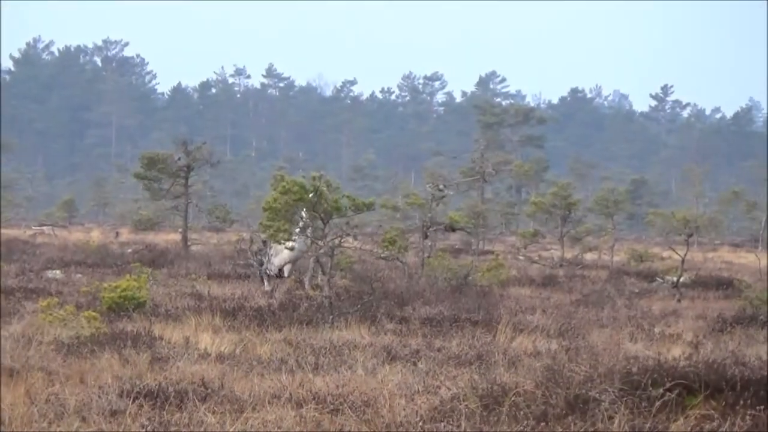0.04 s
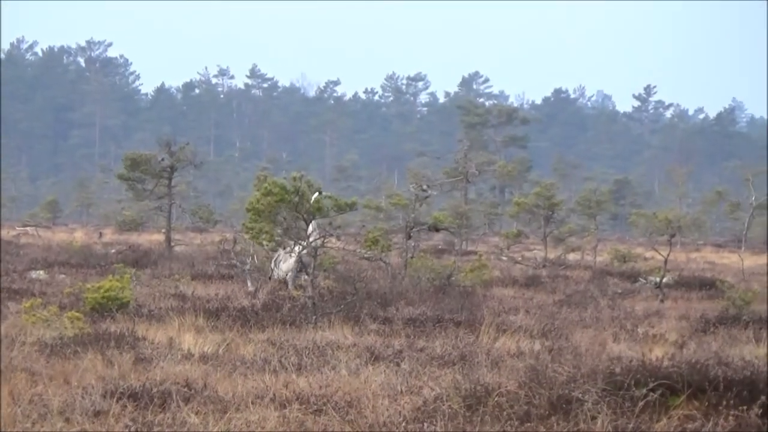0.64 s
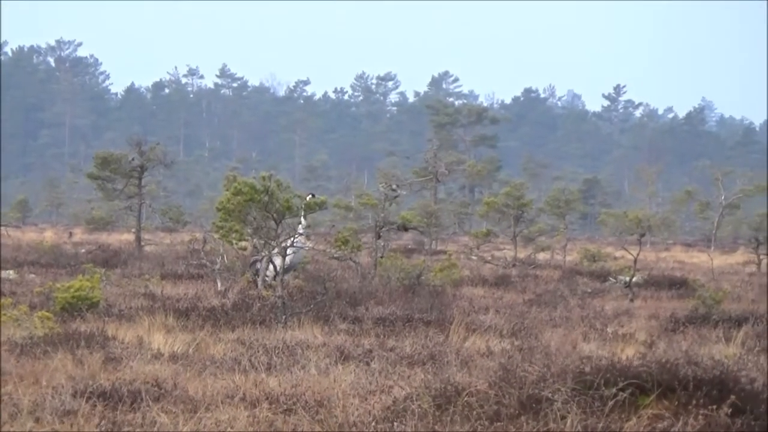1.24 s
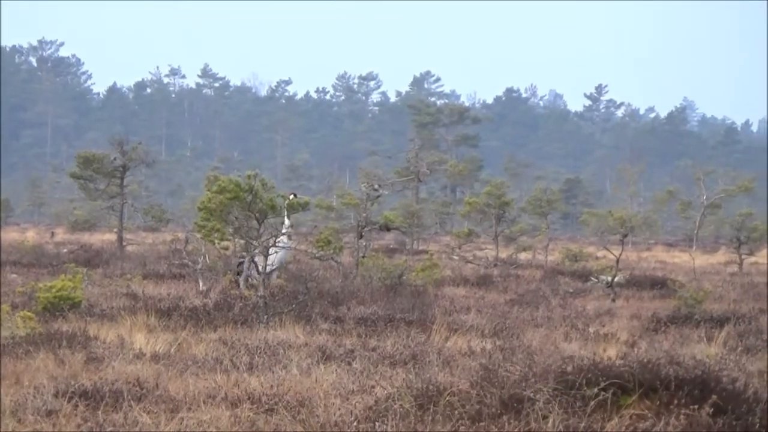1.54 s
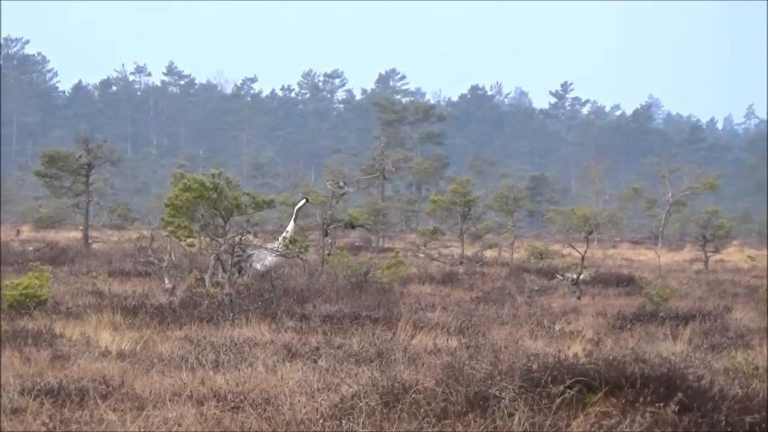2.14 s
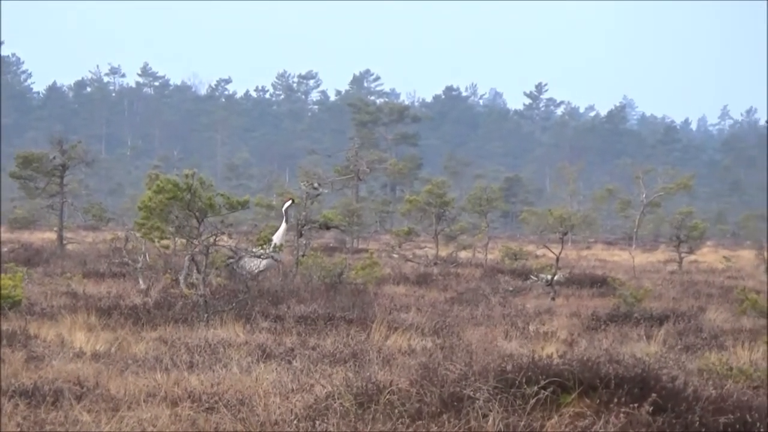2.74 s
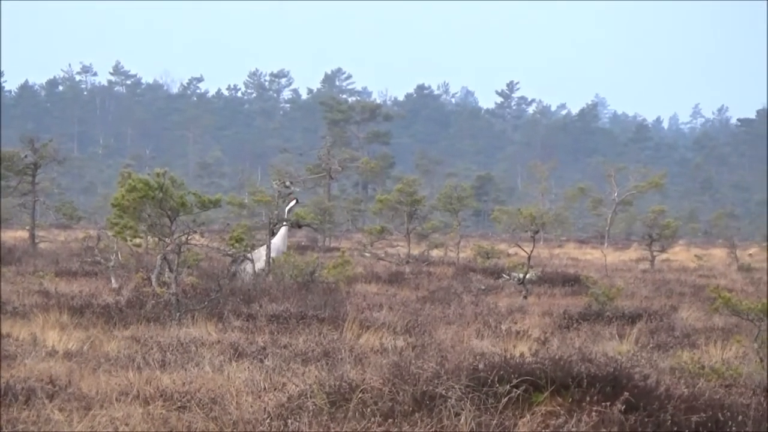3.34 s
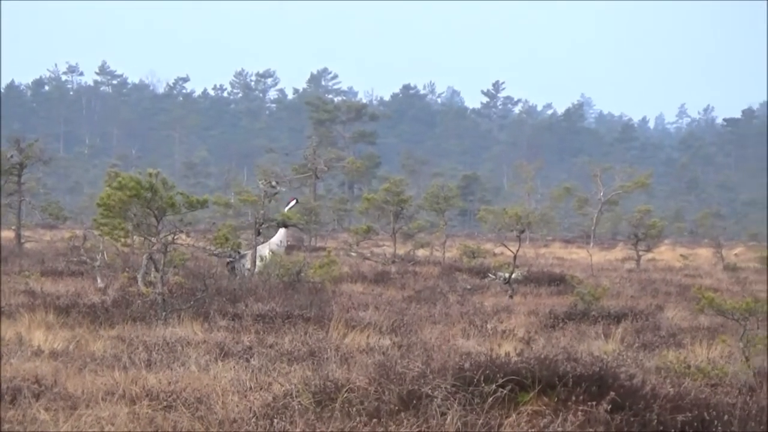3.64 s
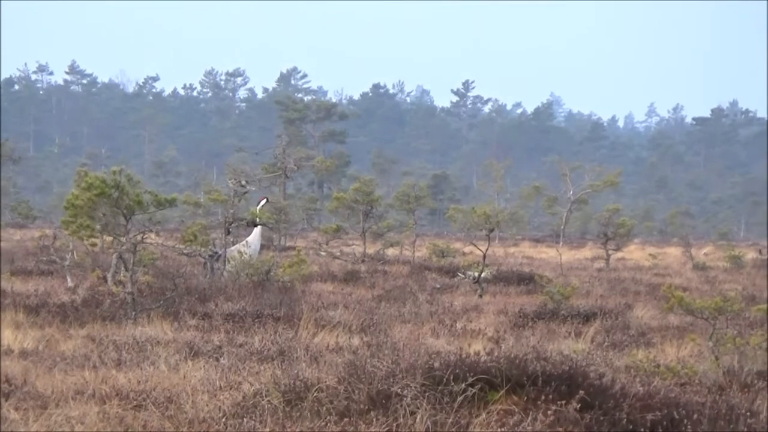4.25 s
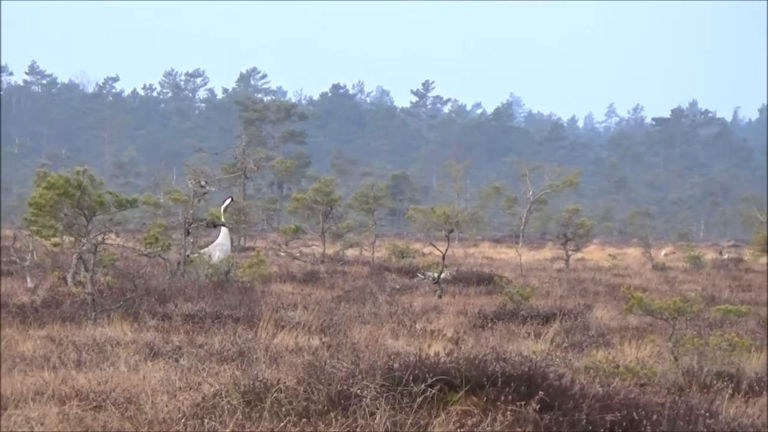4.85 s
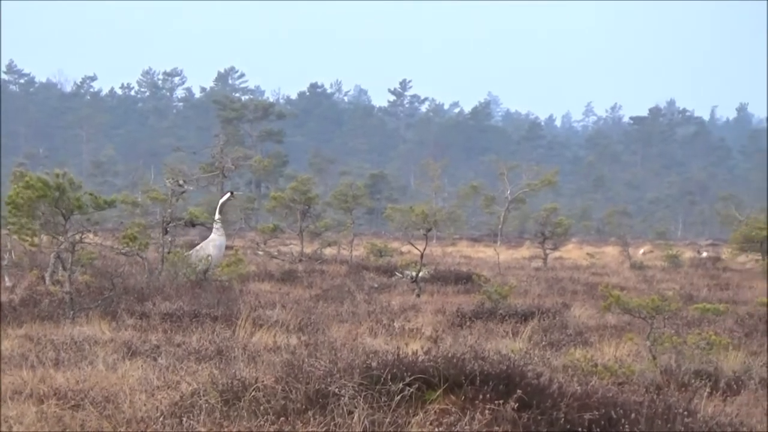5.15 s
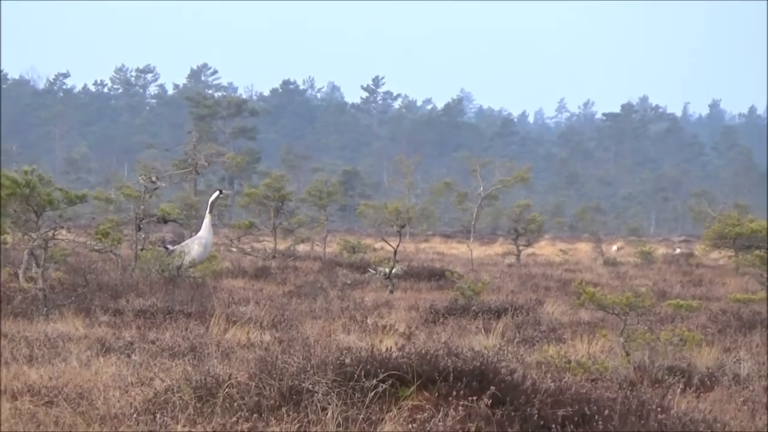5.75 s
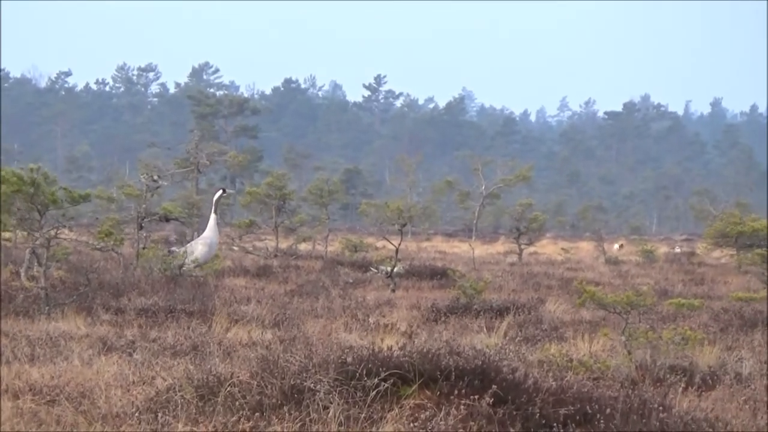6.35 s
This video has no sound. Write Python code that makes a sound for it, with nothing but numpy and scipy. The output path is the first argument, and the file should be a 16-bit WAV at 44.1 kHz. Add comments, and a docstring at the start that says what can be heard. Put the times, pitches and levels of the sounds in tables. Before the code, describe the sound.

A crane gives a short, loud, high trumpeting call that breaks into a croak. For about five seconds there is only wind buffeting the microphone and hissing in dry heather, with close taps and rubs from a hand holding the camera. Then two quick croaks lead into a longer, clear call that sags at its end. A faint, lower call follows, outdoors on an open bog.

```python
"""Crane on a windy bog

A crane's syrinx membrane sounds two loud, nearly pure calls that sag and break up as the air runs out,
then a faint lower one. Shrubs scatter a little of each call back. Close by, a hand-held camera is
rubbed and tapped. Wind buffets the microphone and hisses in the heather."""
import sys
import numpy as np
from scipy import signal
from scipy.fft import rfft, irfft
from scipy.io import wavfile
from scipy.ndimage import uniform_filter1d, map_coordinates

SR = 44100
rng = np.random.default_rng(int(sys.argv[2]) if len(sys.argv) > 2 else 0)


def put_to_file(sound):
    """Save the sound as 16-bit audio at rate SR, in the file named by the first command-line argument."""
    columns = np.atleast_2d(sound).T  # one column per channel
    safe = np.clip(columns, -1, 1)
    whole_steps = np.round(safe * 32767)
    wavfile.write(sys.argv[1], SR, whole_steps.astype(np.int16))


N = 286650
T = np.arange(N) / SR

# Voice courses: (time [s], pitch [Hz], level [dB], overtone gain [dB], roughness [-])
FAINT_CALL = [(6.25, 907, -68, -3, 0.84), (6.29, 888, -66, -10, 0.65), (6.35, 942, -64, -3, 0.3),
              (6.39, 954, -58, -7, 0.1), (6.45, 971, -57, 1.5, 0.1), (6.5, 978, -58.5, 0.5, .04)]
SECOND_VOICE = [(0, 983, -52.5, -17, 0), (.052, 950, -59, -1, 0), (.068, 898, -52.5, -3, 0.2),
                (.1, 887, -52, -5, 0.05), (.15, 860, -56, 3, 0), (.17, 850, -64, 2, .2)]  # other side of the syrinx, under the first call
# Croaks around the clean tone:
# (start [s], length [s], pitch [Hz], level [dB], overtone gain [dB], roughness [-])
CROAKS = [(.172, 0.015, 1099, -36, 3, 0.87), (0.22, 0.049, 1016, -47, 2, 1.08),
          (5.193, .021, 1020, -39, -2, .7), (5.239, .017, 1173, -31.5, -2.5, .35),
          (5.747, 0.056, 1030, -51, -3, .9)]
# Partials of each voice: (harmonic [-], relative level [dB])
FIRST_PARTIALS = [(1, 0), (2, -6), (3, -8), (4, -16), (5, -14), (6, -9), (7, -11), (8, -21), (9, -15),
                  (10, -20), (11, -29)]
SECOND_PARTIALS = [(1, 0.5), (2, -10), (3, -19)]
LONG_PARTIALS = [(1, 0), (2, -29), (3, -10), (4, -23), (5, -26), (6, -27), (7, -40), (8, -31), (9, -36),
                 (10, -40)]
FAINT_PARTIALS = [(1, 0), (2, -4), (3, -3), (4, -14), (5, -10), (6, -11), (7, -17), (8, -15), (9, -21)]
CROAK_PARTIALS = [(1, 0.5), (2, -11.5), (3, -7.5), (4, -15), (5, -19.5), (6, -22), (7, -26), (9, -27)]

# Taps on the camera: (time [s], blow level [dB], treble level [dB], knock pitch [Hz])
TAPS = [(0.873, -25, -32, 1090), (1.021, -33.5, -3, 1440), (1.498, -33, -18, 627), (2.186, -29, -23, 623),
        (2.197, -29, -19, 650), (2.721, -34, -24, 636), (3.288, -23.5, -24, 1670), (3.531, -31, -25, 610),
        (3.804, -32.5, -2.5, 810), (3.836, -23, -27, 1180), (3.878, -25.5, -27, 1030),
        (3.891, -24, -31, 1190), (3.971, -26.5, -23, 912), (4.206, -27.5, -25, 1630),
        (4.235, -23, -14, 1160), (4.645, -32.5, -16, 625), (4.785, -31, -25, 770), (5.822, -36, -6, 918),
        (6.16, -34.5, -23, 600)]
# Housing resonances: (centre [Hz], width [Hz], gain [dB])
HOUSING_MODES = [(686, 450, -1), (1200, 540, 1), (1680, 420, 2.5), (2800, 490, -2), (3800, 990, -10)]
# Firm rubs of hand and sleeve: (start [s], length [s], body level [dB], scrape level [dB])
RUBS = [(0.643, .03, -58, -54.5), (0.693, 0.1, -56, -66), (1.825, 0.096, -69, -63),
        (2.028, 0.012, -60, -50.5), (2.31, 0.023, -49.5, -59), (2.412, 0.057, -47.5, -57),
        (2.489, .04, -49, -54), (2.531, 0.017, -49, -40.5), (2.551, 0.021, -39.5, -42),
        (2.616, 0.019, -45, -55), (2.63, .009, -43, -47), (2.659, .012, -47, -59), (2.716, 0.05, -51, -65),
        (3.028, 0.019, -46, -58.5), (3.278, 0.067, -53.5, -63), (3.555, 0.027, -44.5, -62),
        (3.681, 0.017, -45, -54.5), (3.715, 0.059, -57, -57.5), (3.836, .022, -42, -67),
        (3.943, .014, -46.5, -65), (3.983, 0.012, -37, -37), (3.994, 0.03, -40, -51),
        (4.035, 0.056, -40.5, -47.5), (4.094, .016, -49, -42), (4.238, 0.021, -45, -59),
        (4.403, 0.028, -41.5, -62), (4.883, 0.045, -41, -53.5), (4.956, 0.011, -51, -43),
        (5.032, 0.01, -53.5, -52), (5.351, 0.025, -39.5, -64), (5.437, 0.032, -46, -66),
        (6.17, 0.01, -45.5, -58.5)]

# Wind strength, before each layer's gain: (time [s], buffet level [dB], rustle level [dB])
GUSTS = [(0.3, -58, -73), (0.44, -58, -70), (0.82, -53.5, -65.5), (1.06, -59, -73), (1.25, -58.5, -73.5),
         (1.65, -56, -72), (2.13, -57.5, -74), (2.63, -52, -61), (3.3, -54.5, -67), (3.63, -54.5, -67),
         (4.06, -48, -58.5), (4.39, -53, -67), (4.82, -52, -60.5), (5.01, -52.5, -67), (5.57, -52.5, -59),
         (5.89, -55.5, -68.5), (6.05, -55.5, -69), (6.5, -59.5, -70)]
# Drone of distant air: (time [s], level [dB])
DRONE_LEVEL = [(0, -62), (1.3, -63.5), (2.6, -63.5), (4, -70.5), (6.5, -69.5)]
# Noise spectra: (frequency [Hz], relative density [dB])
BODY_SPECTRUM = [(50, -14), (130, 4), (220, 8.5), (400, 5.5), (750, -4.5), (1200, -1), (2000, -7.5),
                 (3000, -8.5), (4500, -20.5), (9000, -30)]
SCRAPE_SPECTRUM = [(1500, -5.5), (3500, -2.5), (6000, -1), (9000, -3), (12000, -3.5), (15500, -17)]
BUFFET_SPECTRUM = [(20, -32), (45, -9.5), (90, -8.5), (140, -2.5), (190, 1), (270, -2), (380, -5.5),
                   (560, -6), (750, -9), (1100, -20), (1500, -25)]
RUSTLE_SPECTRUM = [(400, -4), (800, 0.5), (1300, 2), (2000, -4.5), (3000, -7), (4500, -16), (8000, -23.5)]
HISS_SPECTRUM = [(2000, -11), (4000, -1), (6500, -1), (9000, 1), (12000, 1), (14000, -2), (16000, -4.5)]
DRONE_SPECTRUM = [(25, -24), (50, -17), (80, -7), (105, 3), (135, -4.5), (220, -18)]

CALL_HZ = 1193  # at full pressure
SCOOP_HZ, SCOOP_S = 85, .0169  # quick rise into pitch
TIGHTEN_HZ, TIGHTEN_S = 16, .09  # slower rise
SAG_HZ, SAG_S = 73.2, .032  # air runs out
BREAK_HZ, SLIDE_HZ_PER_S, SLIDE_S = 37.8, 1420, .049  # voice drops, slides away
RATTLE_HZ, RATTLE_DB, RATTLE_ROUGH, RATTLE_S = 46.2, 4, .159, .046  # until the membrane settles
EDGE_S = .0023  # voice on/off


def crane():
    """Two loud calls, croaks and a faint call; little sounds below the fundamental."""
    first_call = call_course(start_s=-.3, break_s=.174, db=-33.5, loss_db_per_hz=-.0069, fade_db_per_s=286)
    long_call = call_course(start_s=5.249, break_s=5.7, db=-30.5, loss_db_per_hz=.0758, fade_db_per_s=7)
    voice = syrinx(first_call, FIRST_PARTIALS, waver_db=3.5, rasp_db=-5)
    voice += syrinx(SECOND_VOICE, SECOND_PARTIALS, waver_db=1.5, rasp_db=-15)
    voice += syrinx(long_call, LONG_PARTIALS, waver_db=7, rasp_db=-11.5)
    voice += sum(croak(*row) for row in CROAKS)
    voice += syrinx(FAINT_CALL, FAINT_PARTIALS, waver_db=2, rasp_db=-4)
    return signal.sosfilt(signal.butter(6, 760, "high", fs=SR, output="sos"), voice)


def call_course(start_s, break_s, db, loss_db_per_hz, fade_db_per_s):
    """The membrane tightens, holds, sags and breaks; slack makes it lower, duller and rougher."""
    time_s = np.arange(start_s, break_s + SLIDE_S, 1 / SR)
    age_s = time_s - start_s
    left_s, broken_s = np.maximum(break_s - time_s, 0), np.maximum(time_s - break_s, 0)
    slack_hz = SCOOP_HZ * np.exp(-age_s / SCOOP_S) + TIGHTEN_HZ * np.exp(-age_s / TIGHTEN_S)
    slack_hz += SAG_HZ / (1 + left_s / SAG_S)
    slack_hz += BREAK_HZ * (broken_s > 0) + SLIDE_HZ_PER_S * broken_s
    unsettled = np.exp(-age_s / RATTLE_S)
    level_db = db - loss_db_per_hz * slack_hz - fade_db_per_s * broken_s
    level_db += RATTLE_DB * unsettled * np.cos(2 * np.pi * RATTLE_HZ * age_s)
    level_db -= 20 * np.exp(-np.minimum(age_s, time_s[-1] - time_s) / EDGE_S)
    bright_db = 1.7 - 5 * np.tanh(slack_hz / 36)
    rough = .0089 + .296 * np.tanh(slack_hz / 100) ** 3 + RATTLE_ROUGH * unsettled
    return np.column_stack([time_s, CALL_HZ - slack_hz, level_db, bright_db, rough])


def syrinx(course, partials, waver_db, rasp_db, jitter=.058, shimmer=.55, tremor=.00068, flutter_db=2.5):
    """A membrane beats at one clean pitch and flutters chaotically at low pressure."""
    hz, db, bright_db, rough = curves(course)
    on = (T >= course[0][0]) & (T <= course[-1][0])
    wobble = 1 + jitter * rough * walk(700) + tremor * walk(150)
    phase = 2 * np.pi * np.cumsum(hz * wobble)[on] / SR
    rough = np.clip(rough[on], 0, 1)
    sag_octaves = np.log2(hz.max() / hz[on])
    wave = 0
    for k, base_db in partials:
        partial_db = base_db + (k > 1) * bright_db[on]
        partial_db -= 5 * sag_octaves * max(k - 3, 0)  # softer closure dulls the top
        air_drift = np.tanh(walk(18) + .5 * walk(70))[on]
        partial_db += min(k / 6, 1) ** 2 * waver_db * air_drift  # short waves waver most
        partial_db += flutter_db * np.minimum(5 * rough, 1) * np.tanh(walk(200)[on])
        wave += undb(partial_db) * np.sin(k * phase + rng.uniform(0, 2 * np.pi))
    breath = noise([(1000, 2), (1600, 4), (3600, 3.5), (5000, -7), (9000, -15), (14000, -17)])[on]
    wave += undb(rasp_db) * rough * breath * (1 + np.cos(phase))  # one puff per beat
    uneven = shimmer * walk(500)[on] + .5 * np.sin(phase / 2)  # strong and weak beats alternate
    wave *= (1 + rough * uneven) / np.sqrt(1 + .46 * rough ** 2)
    out = np.zeros(N)
    out[on] = np.sqrt(2) * undb(db[on]) * wave
    return out


def croak(start_s, length_s, hz, db, bright_db, rough, fade_db=15.5):
    """Low pressure: an abrupt, hoarse note dies away; the brighter it is, the more air rasps through."""
    age_s = np.arange(0, length_s, 1 / SR)
    level_db = db - 20 * np.exp(-age_s / EDGE_S) - fade_db * (age_s / length_s) ** 2
    course = np.column_stack(np.broadcast_arrays(start_s + age_s, hz, level_db, bright_db, rough))
    return syrinx(course, CROAK_PARTIALS, waver_db=5.5, rasp_db=bright_db - 8)


def wheeze(db=-60):
    """A thin hiss opens the faint call."""
    swell = np.interp(T, [6.24, 6.29, 6.36, 6.43], [0, .9, 1, .24])
    return undb(db) * swell * noise([(3600, -21), (4400, 5), (5800, 2), (7500, -5), (9500, -20)])


def shrub_echo(voice, gain_db=-21, t60_s=.18):
    """Shrubs and pines scatter back a short, diffuse tail."""
    tail = noise([(500, 13.5), (1500, -3), (4000, -19), (12000, -10)]) * undb(-60 * T / t60_s)
    return undb(gain_db) * signal.fftconvolve(voice, tail / np.linalg.norm(tail))[:N]


def taps(rattle=.088, rattle_t60_s=.048, shell_db=-1, knock_db=-6, tick_db=1):
    """Each tap is one push: a pitched knock, a brief rattle of the housing and a tick."""
    shell, knocks, ticks = np.zeros((3, N))
    age_s = T[:SR // 25]
    for time_s, db, treble_db, hz in TAPS:
        span = slice(int(time_s * SR), int(time_s * SR) + len(age_s))
        chatter = rattle * rng.standard_normal(len(age_s)) * undb(-60 * age_s / rattle_t60_s)
        blow = undb(db) * ((age_s == 0) + chatter)
        shell[span] += undb(shell_db) * blow
        knocks[span] += undb(db + knock_db) * knock(hz, decay_cycles=1.94)
        ticks[span] += undb(treble_db + tick_db) * blow
    return housing(shell) + knocks + colour(ticks, SCRAPE_SPECTRUM)


def housing(x):
    """The plastic shell rings in a few broad modes; unit power gain for white noise."""
    def ring(push):
        return sum((-1) ** k * undb(db) * signal.lfilter(*signal.iirpeak(hz, hz / width_hz, SR), push)
                   for k, (hz, width_hz, db) in enumerate(HOUSING_MODES))
    return ring(x) / np.linalg.norm(ring(signal.unit_impulse(SR // 10)))


def knock(hz, decay_cycles):
    """A small stiff part is plucked and rings briefly."""
    cycles = hz * T[:SR // 25]
    return np.sin(2 * np.pi * cycles) * (1 - np.exp(-2 * cycles)) * np.exp(-cycles / decay_cycles)


def rubs(catch_share=.27, creak_db=-5, judder_db=1.9):
    """Skin and cloth catch, then slip in tiny steps: the camera rumbles and creaks, its skin scrapes."""
    body, surface = np.zeros((2, N))
    for start_s, length_s, body_db, scrape_db in RUBS + brushes():
        progress = (T - start_s) / length_s
        stroke = np.clip(progress / catch_share, 0, 1) * np.exp(-np.minimum(progress ** 2, 20))
        body += undb(body_db) * stroke
        surface += undb(scrape_db) * stroke
    rumble = colour(body * grains(per_s=6000, spread_db=-1), BODY_SPECTRUM)
    creak = undb(creak_db) * body * creaks(per_s=450, decay_cycles=1.56, spread_db=6)
    slips = surface * undb(judder_db * walk(140)) * grains(per_s=7000, spread_db=1.6)
    return rumble + creak + colour(slips, SCRAPE_SPECTRUM)


def brushes(per_s=9, mean_length_s=.0087, body_gain_db=5.5, scrape_gain_db=3.5, spread_db=3):
    """Light rubs at random times, growing with the rustle; rows as in RUBS."""
    _, rustle_db = curves(GUSTS)
    when, length, body, scrape = rng.random((int(per_s * N / SR), 4)).T
    at = (when * N).astype(int)
    body_db = rustle_db[at] + body_gain_db + spread_db * (2 * body - 1)
    scrape_db = rustle_db[at] + scrape_gain_db + spread_db * (2 * scrape - 1)
    return list(zip(T[at], mean_length_s * (.5 + length), body_db, scrape_db))


def creaks(per_s, decay_cycles, spread_db):
    """Many little knocks of random pitch (800-3200 Hz) and size; rms 1."""
    out = np.zeros(N + SR // 25)
    for when, pitch, size in rng.random((int(per_s * N / SR), 3)):
        at = int(when * N)
        gain = undb(spread_db * size ** 2 - 4 * pitch)
        out[at:at + SR // 25] += gain * knock(800 * 2 ** (2 * pitch), decay_cycles)
    return unit(out[:N])


def wind(buffet_gain_db=.5):
    """Eddies buffet the microphone and stir the heather over a drone of distant air."""
    buffet_db, rustle_db = curves(GUSTS)
    hiss_db = -67 + .11 * (rustle_db - rustle_db.mean()) + .62 * walk(7.1)
    flutter_db = 1.47 * walk(45)
    drone = noise(DRONE_SPECTRUM) * undb(curves(DRONE_LEVEL)[0])
    buffet = noise(BUFFET_SPECTRUM) * undb(buffet_db + buffet_gain_db + flutter_db)
    return drone + buffet + heather(rustle_db, hiss_db, flutter_db)


def heather(rustle_db, hiss_db, flutter_db, rustle_gain_db=5, twig_gain_db=1, stalk_gain_db=-6):
    """Dry heather rustles, twigs creak and stalks tick under a fine hiss."""
    rustle = colour(grains(per_s=5000, spread_db=.8), RUSTLE_SPECTRUM)
    rustle *= undb(rustle_db + rustle_gain_db + flutter_db + 2.3 * walk(90))
    twigs = creaks(per_s=170, decay_cycles=4.4, spread_db=31) * undb(rustle_db + twig_gain_db)
    stalks = colour(grains(per_s=400, spread_db=-1.5), SCRAPE_SPECTRUM) * undb(rustle_db + stalk_gain_db)
    hiss = colour(grains(per_s=27000, spread_db=-.5), HISS_SPECTRUM) * undb(hiss_db + 2.62 * walk(60))
    return rustle + twigs + stalks + hiss


def grains(per_s, spread_db):
    """Random clicks of unequal size; rms 1."""
    clicks = (rng.random(N) < per_s / SR) * rng.standard_normal(N)
    return unit(clicks * undb(spread_db * np.minimum(rng.exponential(size=N), 4)))


def walk(rate_hz):
    """Random steps, smoothed twice; rms 1."""
    hold = max(int(SR / rate_hz), 2)
    steps = np.repeat(rng.standard_normal(N // hold + 1), hold)[:N]
    return unit(uniform_filter1d(uniform_filter1d(steps, hold), hold))


def noise(spectrum):
    """Gaussian noise shaped by (frequency [Hz], relative density [dB]) points."""
    return colour(rng.standard_normal(N), spectrum)


def colour(x, spectrum):
    """Minimum-phase filter through (frequency [Hz], level [dB]); unit power gain for white noise."""
    hz, db = np.transpose(spectrum)
    log_hz = np.log(np.maximum(np.arange(N // 2 + 1) * SR / N, 1))
    outside = np.maximum(np.log(hz[0]) - log_hz, 0) + np.maximum(log_hz - np.log(hz[-1]), 0)
    gain = unit(undb(np.interp(log_hz, np.log(hz), db) - 20 * outside))
    cepstrum = irfft(np.log(gain), N)
    cepstrum[1:N // 2] *= 2
    cepstrum[N // 2 + 1:] = 0
    return irfft(rfft(x) * np.exp(rfft(cepstrum)), N)


def curves(rows):
    """Columns after time, interpolated per sample."""
    time_s, *columns = np.transpose(rows)
    return [np.interp(T, time_s, column) for column in columns]


def undb(db):
    """Decibels to gain."""
    return 10 ** (np.asarray(db) / 20)


def unit(x):
    """Scale to rms 1."""
    return x / np.sqrt(np.mean(x ** 2))


def scene(pan_db=1.17, pan_below_hz=1500, right_lag_s=1e-6):
    """Two microphone ports hear one sound; the left leads, with slightly more bass and middle."""
    calls = crane()
    mono = calls + shrub_echo(calls) + wheeze() + wind() + rubs() + taps()
    low = signal.sosfiltfilt(signal.butter(3, pan_below_hz, fs=SR, output="sos"), mono)
    left = mono + low * (undb(pan_db / 2) - 1)
    right = mono + low * (undb(-pan_db / 2) - 1)
    return np.array([left, map_coordinates(right, [(T - right_lag_s) * SR], mode="mirror")])


def record(dry, top_hz=15550):
    """The camera cuts the top treble."""
    return signal.sosfilt(signal.ellip(10, .2, 80, top_hz, fs=SR, output="sos"), dry)


dry = scene()
out = record(dry)
put_to_file(out)
```